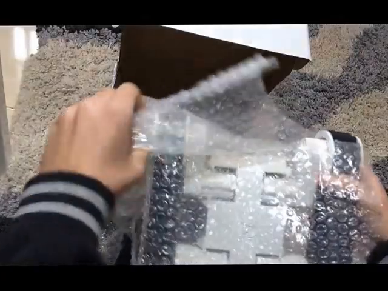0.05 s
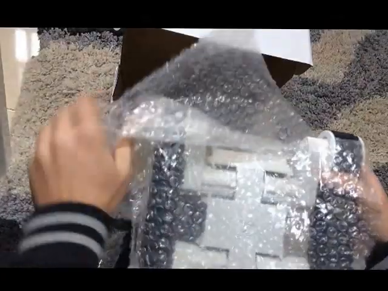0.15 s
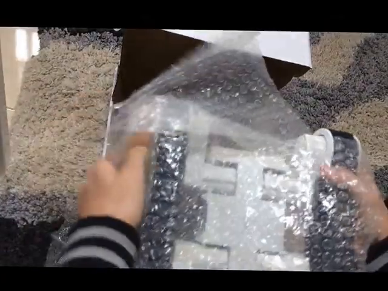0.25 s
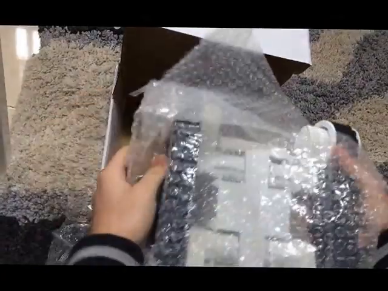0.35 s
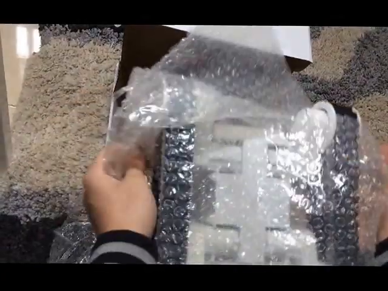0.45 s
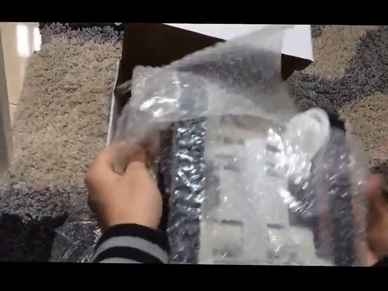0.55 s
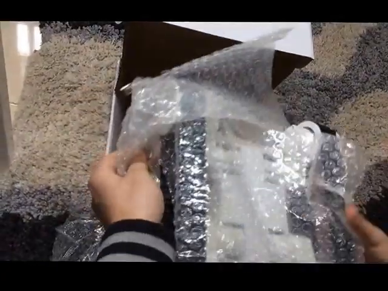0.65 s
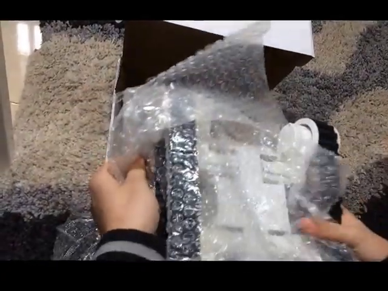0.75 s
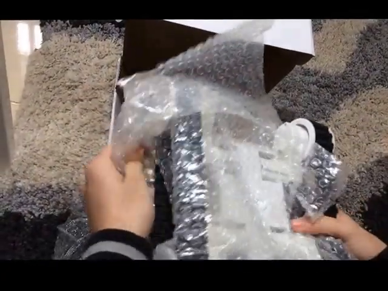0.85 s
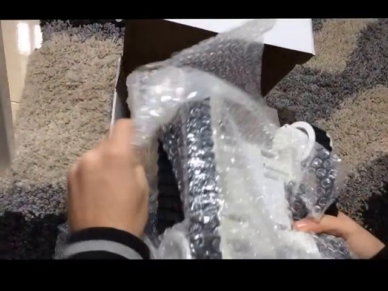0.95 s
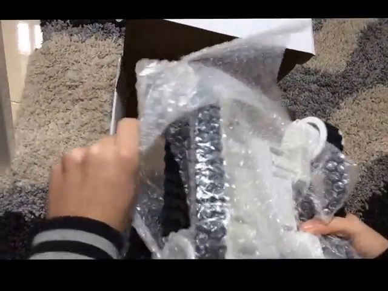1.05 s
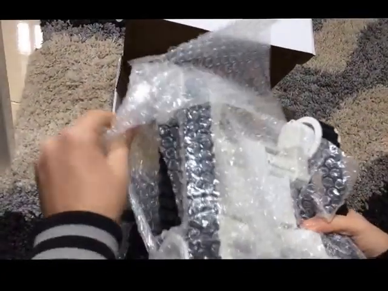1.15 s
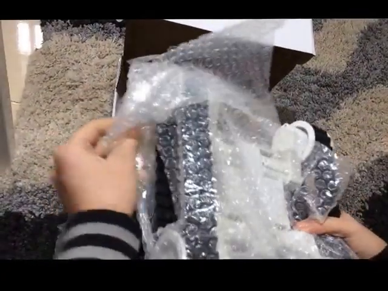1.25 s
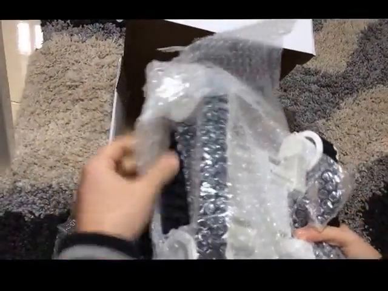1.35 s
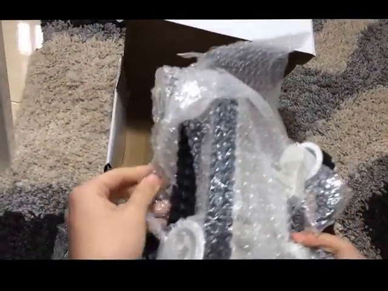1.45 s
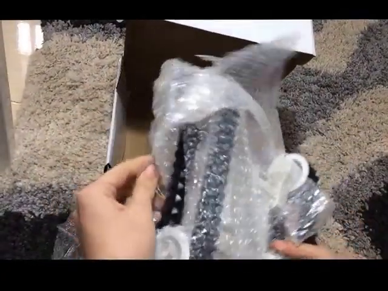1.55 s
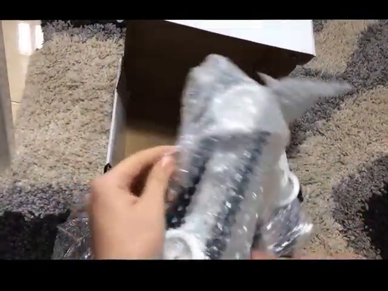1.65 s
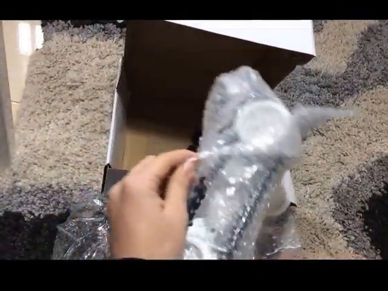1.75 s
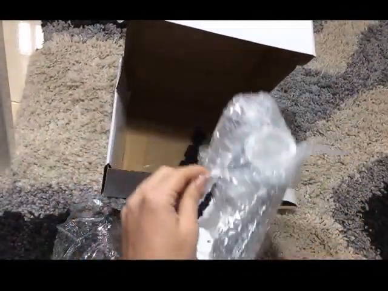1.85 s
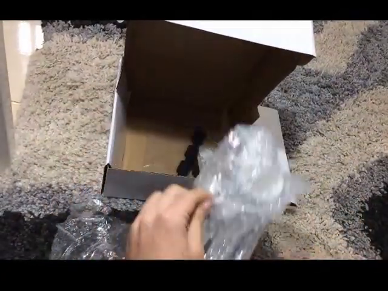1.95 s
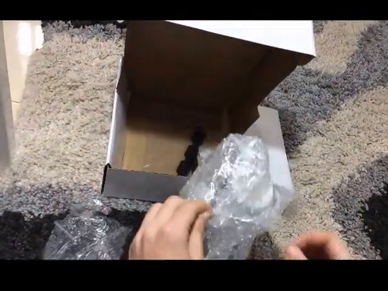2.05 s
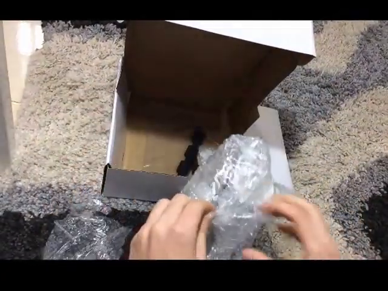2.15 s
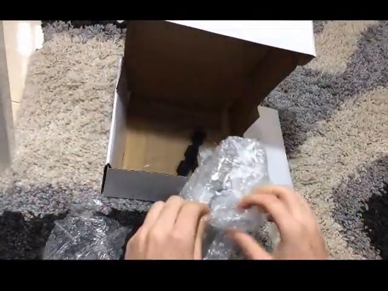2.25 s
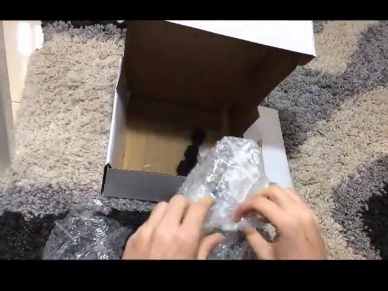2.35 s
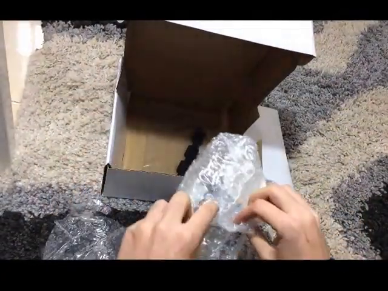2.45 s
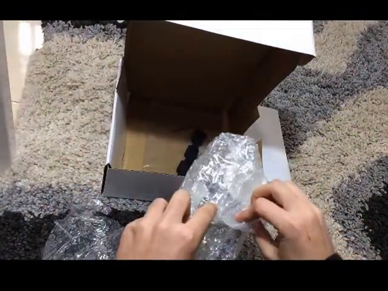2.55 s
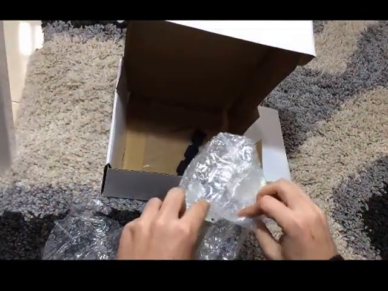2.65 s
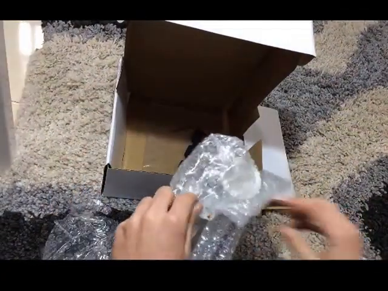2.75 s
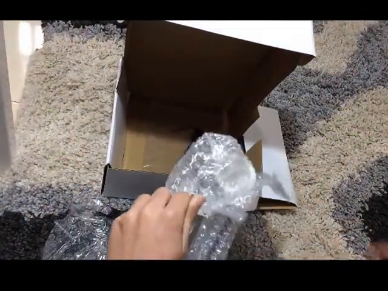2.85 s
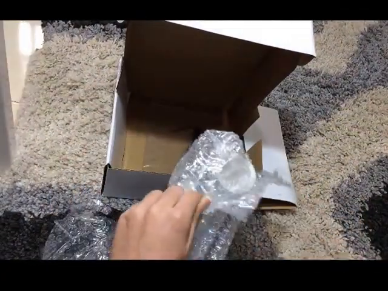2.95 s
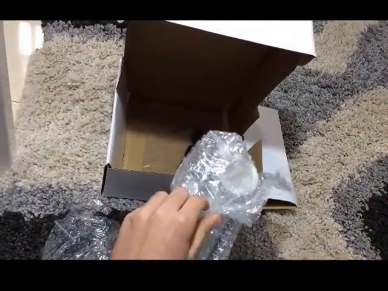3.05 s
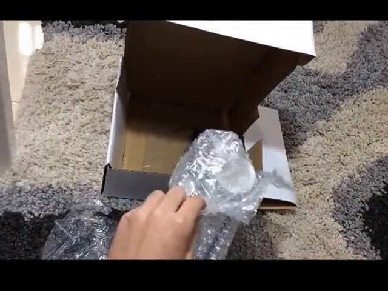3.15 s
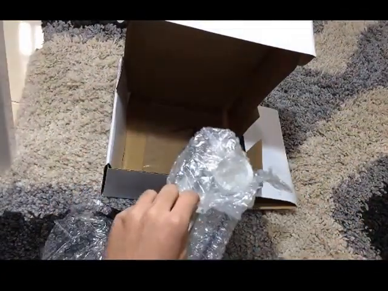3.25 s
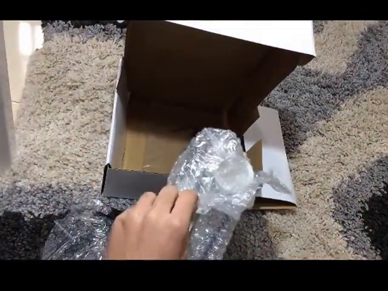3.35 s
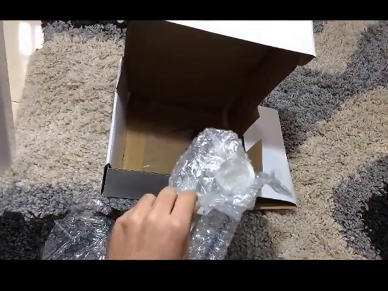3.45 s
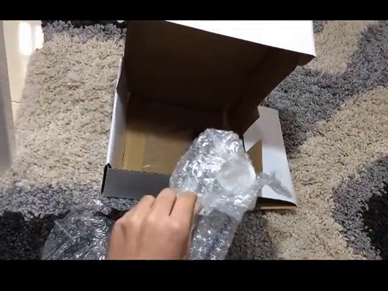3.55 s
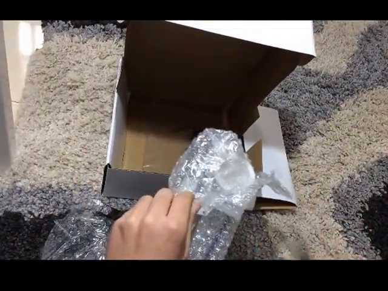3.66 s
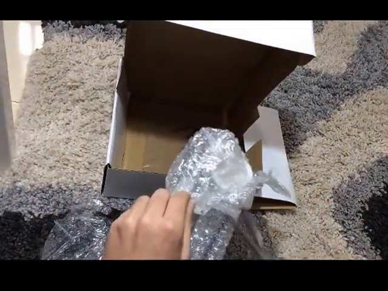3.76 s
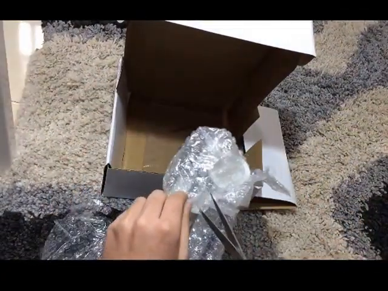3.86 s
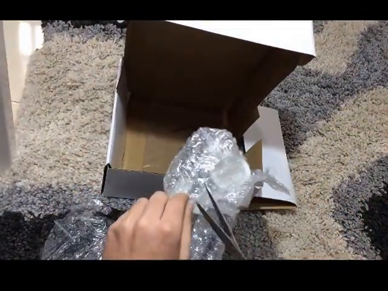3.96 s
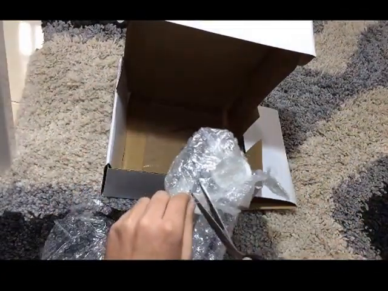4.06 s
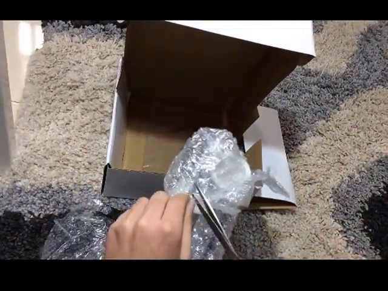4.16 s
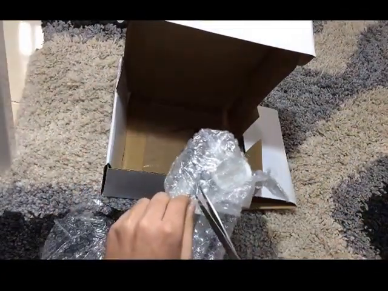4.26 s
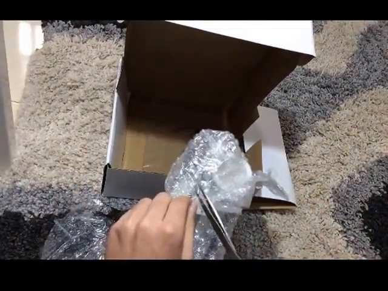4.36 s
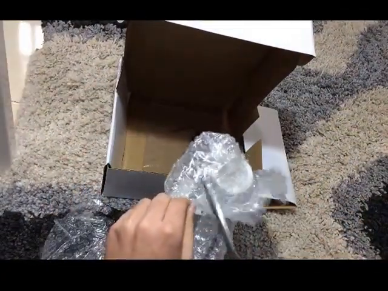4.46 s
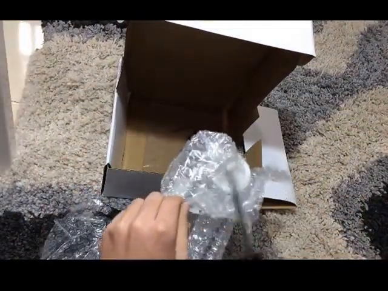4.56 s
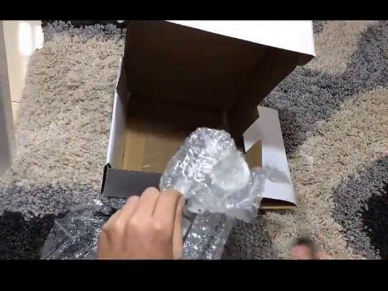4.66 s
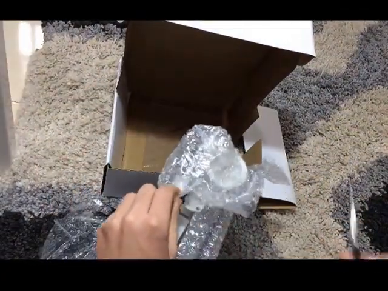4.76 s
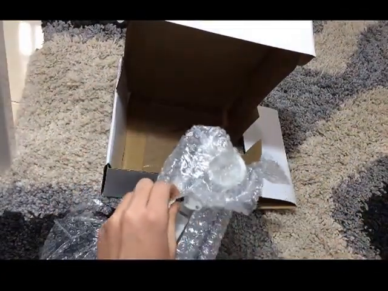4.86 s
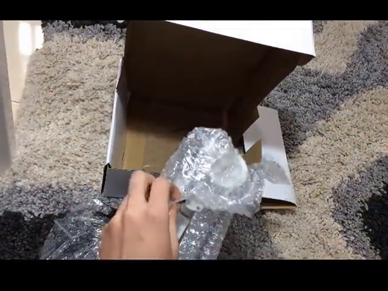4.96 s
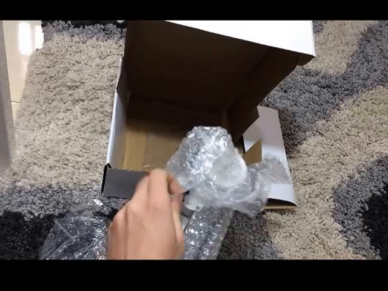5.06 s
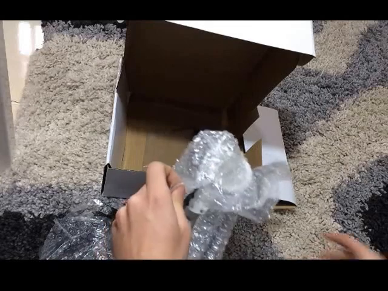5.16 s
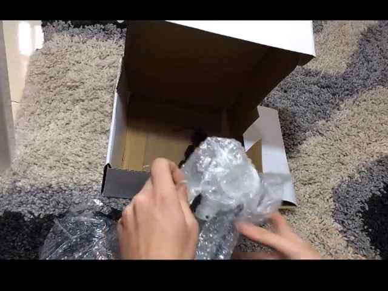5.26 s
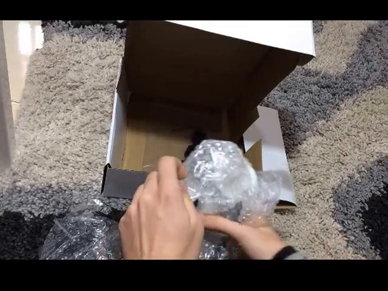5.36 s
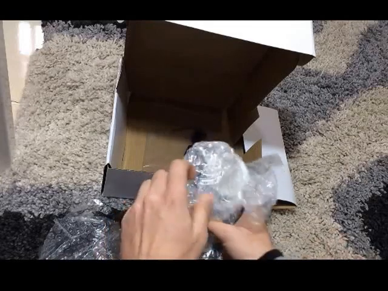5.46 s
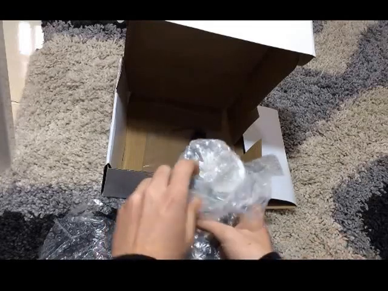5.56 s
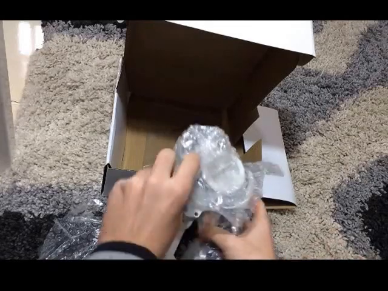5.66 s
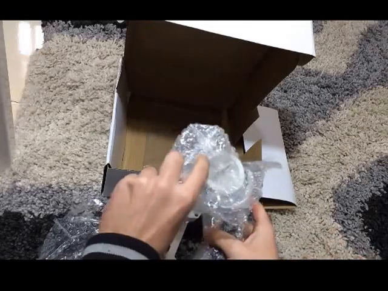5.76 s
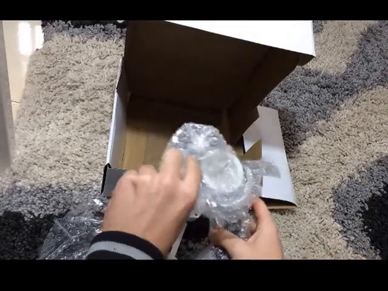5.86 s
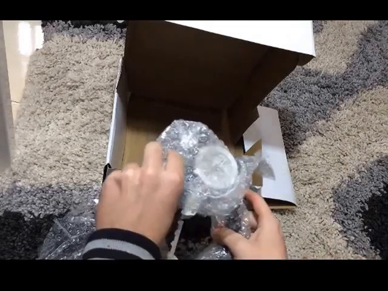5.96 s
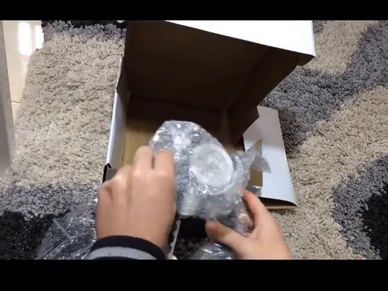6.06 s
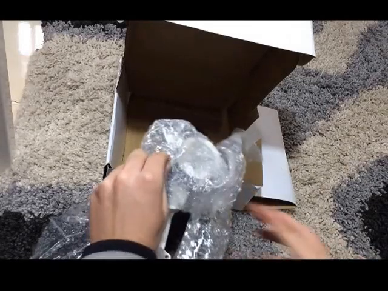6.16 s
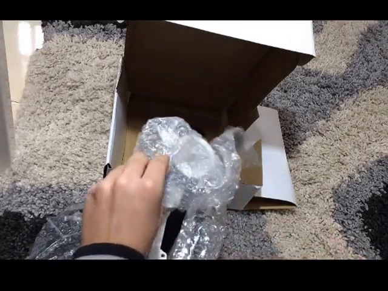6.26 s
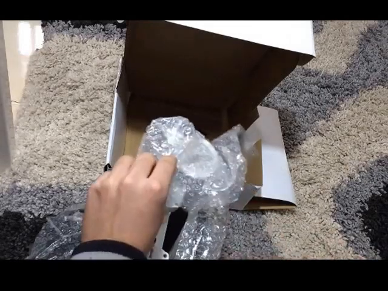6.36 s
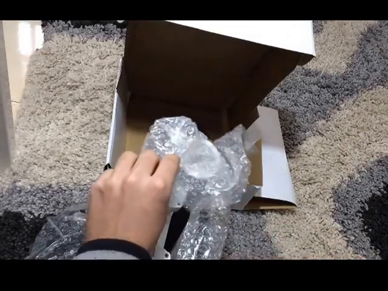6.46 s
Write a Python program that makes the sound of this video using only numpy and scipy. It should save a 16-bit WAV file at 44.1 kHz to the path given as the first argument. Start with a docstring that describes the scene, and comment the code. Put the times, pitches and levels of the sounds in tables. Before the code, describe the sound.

Close, bright bubble-wrap rustle in a small furnished room, over very faint low rumble and hiss. From 0 to 1.7 s hands tug and turn the wrapped object: uneven crinkling surges, fast crackles, hollow snaps and soft dull bumps, with a strong tug near 0.17 s and the hardest snap and thump around 1.1 s. It eases from 1.7 s with brief dips near 2.1 and 2.3 s, then a crisp, thinner crackle builds, densest at 2.7-3.0 s. It drops abruptly; 3.1-5.0 s is almost quiet, with faint ticks, one clear snip at 4.35 s and a sharper cluster with a small bump at 4.6 s. Rustling rises again from 5.2 s, fullest around 5.6-5.8 s, with loud snaps near 5.88 and 6.06 s, then softens into light crinkles and low muffled handling by 6.5 s.

```python
"""Dry film rustle, sharp crease snaps and dull bumps: hands peel bubble wrap off a plastic object over a cardboard box.
Rustle is coloured noise gated by swarms of tiny creases and scaled by the handling.
Snaps are short noise cracks with ringing air pockets; bumps are damped sines of the load and the cardboard.
A small furnished room answers snaps and bumps with decaying noise, over a low rumble and hiss of shaped noise."""
import sys
import numpy as np
from scipy import signal
from scipy.fft import rfft, irfft, next_fast_len
from scipy.io import wavfile
from scipy.ndimage import map_coordinates

SR = 44100
rng = np.random.default_rng(int(sys.argv[2]) if len(sys.argv) > 2 else 0)


def transcribe(signal):
    """Save signal, clipped to [-1, 1], as a 16-bit WAV file at the path in sys.argv[1]."""
    frames = np.atleast_2d(signal).T
    limited = np.clip(frames, -1, 1)
    pcm = np.round(limited * 32767).astype(np.int16)
    wavfile.write(sys.argv[1], SR, pcm)


N = 287532

# Clearest creases that snap: time_s, level_db (relative), brightness_db (upper re lower treble),
# ring_db (hollow ring of the air pockets, relative)
CLEAR_SNAPS = [(0.0653, -29.5, 9, -19), (0.1279, -41.5, -6, 5), (0.1491, -20.5, -1, -8.5),
               (0.1728, -20, 1, -10.5), (0.38, -36, 14, -9), (0.4035, -37, 0, -12), (0.6024, -33, 2, -22),
               (0.6322, -25.5, 4, -25), (0.6495, -26, -1, -22), (0.6563, -27.5, 1, -14),
               (0.7632, -30, 11, -14), (0.9001, -33, 2, -25), (0.9913, -35.5, 9, 0.5),
               (1.051, -24.5, 1, -9), (1.059, -23, -9, -9), (1.102, -36.5, -11, 5.5),
               (1.1363, -12, -5.5, -22.5), (1.16, -21, 0, -29), (1.1719, -24.5, 7, -11.5),
               (1.2434, -32, -3, -20), (1.3427, -32.5, -2, -23), (1.3864, -36, 3, -14),
               (1.4737, -27, -7, -19), (1.5141, -29.5, 2, -15), (1.5258, -36, -1, -15),
               (1.5354, -24, -9, -27), (1.5973, -26, 15, -25), (1.607, -23.5, 3, -39),
               (1.6333, -29, 2, -27), (1.6772, -33, 10, -24), (1.8287, -25, -15, -35),
               (1.8981, -27, -9, -33), (2.0415, -43, -1, -18), (2.1929, -50, 2, -11),
               (2.388, -33.5, 6, -10.5), (2.45, -30.5, 2, -23), (2.4774, -27, 13, -31),
               (2.5355, -38, -5, -1), (2.59, -36, -13, -26), (2.5922, -22.5, 9, -22),
               (2.6405, -22, 5.5, -27), (2.6441, -30, 14, -25), (2.6965, -33, 7, -16),
               (2.7252, -39, 11, -27), (2.737, -25, 4.5, -43), (2.773, -25, 8, -39),
               (2.8001, -29, -7, -13.5), (2.8058, -17.5, 2.5, -18.5), (2.8302, -24, -1, -39),
               (2.8756, -25.5, 14, -29), (2.8825, -21.5, 1.5, -17), (2.9231, -17.5, 3, -28),
               (2.9303, -23, 0, -21), (2.9331, -20, 6, -16), (2.977, -33, 8, -26), (2.99, -28, 7, -22),
               (2.9943, -26.5, 3, -16), (3.0067, -36, -1, -14), (3.0874, -41, -2, -13),
               (3.1068, -40.5, 2, -5), (3.1195, -40, -5, -17), (3.129, -34.5, 6, -19),
               (3.2336, -37, 1, -18), (3.2647, -43, -4, -27), (3.313, -35, -1.5, -15),
               (3.418, -47, -1, -21), (3.456, -42.5, 2, -18), (3.5285, -46, 16, -39),
               (3.5393, -48, -6, -14), (3.577, -51, 15, -24), (3.5996, -47, 3, -11.5),
               (3.6471, -50, 8, -13), (3.6792, -50, -7, -14), (3.7122, -35.5, -1, -26),
               (3.7446, -45.5, 5, -17), (3.8367, -46.5, 3, -11.5), (3.8686, -51.5, 4, -15),
               (3.9541, -47, 10.5, -19), (3.9697, -46.5, 3, -20), (4.0297, -35.5, 4.5, -15.5),
               (4.14, -54, -5.5, -19), (4.1552, -38.5, 1, -20.5), (4.2242, -59, -2, -19),
               (4.2475, -41, 2, -23), (4.3495, -41, 0, -24), (4.3542, -21, 4, -19),
               (4.4038, -31.5, 6.5, -35), (4.517, -46.5, 8, -17), (4.5843, -44, 1, -20),
               (4.5955, -50, 10, -5), (4.606, -24.5, -7, -29), (4.6098, -14, 29, -37),
               (4.612, -16.5, -2, -10.5), (4.6167, -23, 4, -10.5), (4.6275, -38, 3, -12),
               (4.6356, -26, -9, -34), (4.8091, -40.5, -2, -11.5), (4.8884, -36.5, 8.5, -31),
               (4.9453, -41, 0, -12), (4.9557, -40.5, 3, -20), (5.1013, -30, -1.5, -23),
               (5.1841, -43, 16, -20), (5.215, -31, 7, -23), (5.2459, -26, 5, -22), (5.253, -32.5, -4, -16),
               (5.2872, -29, -1, -18.5), (5.3845, -31, -4, -34), (5.397, -34, -4, -14),
               (5.448, -41, 4, -21), (5.506, -33.5, 1, -12.5), (5.592, -28.5, 17, -12.5),
               (5.7789, -35, 9, -23), (5.862, -29, 12, -13), (5.8767, -16, 0, -14.5),
               (5.9375, -40, -4, -14), (5.9605, -29.5, 4, -15), (5.9856, -26.5, 7, -18.5),
               (6.025, -24, 1.5, -12.5), (6.0387, -41, 9, -26), (6.0603, -21, -2, -13.5),
               (6.0666, -18, -6, -19), (6.0869, -25, 2, -36), (6.1936, -37, 11, -10.5),
               (6.2191, -31, 9, -22), (6.3011, -38.5, -3, -3), (6.3404, -35, -1, -5.5),
               (6.373, -31.5, 1, -20), (6.441, -41.5, -22, 5), (6.453, -58, -2, -3),
               (6.5125, -42.5, -1, -29)]


def amp(db):
    """Amplitude factor of a level in dB."""
    return 10 ** (np.asarray(db) / 20)


def unit(x):
    """Each row at rms 1."""
    return x / np.sqrt(np.mean(x ** 2, axis=-1, keepdims=True) + 1e-20)


def along(points, hz):
    """(Hz, value) points interpolated on a log frequency axis."""
    f, v = np.transpose(points)
    return np.interp(np.log(hz + 1), np.log(f + 1), v)


def wobble(knots_per_s):
    """Smooth random curve through normal knots."""
    knots = rng.standard_normal(int(N * knots_per_s / SR) + 4)
    return map_coordinates(knots, [np.arange(N) * knots_per_s / SR])


def filtered(x, response):
    """x times a gain that depends on frequency."""
    n = x.shape[-1]
    m = next_fast_len(n + 4096)
    return irfft(rfft(x, m) * response(np.fft.rfftfreq(m, 1 / SR)), m)[..., :n]


def coloured(x, spectrum):
    """x through a (Hz, dB) spectrum, at rms 1."""
    return unit(filtered(x, lambda hz: amp(along(spectrum, hz))))


def place(times_s, shapes):
    """Sum of one short shape per event."""
    starts = np.round(np.asarray(times_s) * SR).astype(int)[:, None]
    at = starts + np.arange(shapes.shape[1])
    return np.bincount(np.clip(at, 0, N).ravel(), shapes.ravel(), N + 1)[:N]


def air():
    """Shaped noise: the room's low rumble drifts, the hiss above it is even."""
    level_db, rumble_top_hz = -71, 200
    # Noise spectrum before the rumble lift: freq_hz, level_db (relative, per Hz)
    air_spectrum = [(26, -25), (48, 3), (108, 5), (185, -7.5), (531, -7), (591, -14.5), (1370, -18.5),
                    (4140, -20.5), (10100, -37), (14800, -42), (16000, -47)]
    noise = coloured(rng.standard_normal(N), air_spectrum)
    rumble = filtered(noise, lambda hz: hz < rumble_top_hz)
    hiss = noise - rumble
    rumble_lift_db = 7.5 + 2.5 * wobble(3.01)
    return amp(level_db) * (hiss + amp(rumble_lift_db) * rumble)


def room(x):
    """Each frequency dies at its own speed; a fresh noise tail is drawn for every quarter second of sound."""
    # Decay of the room: freq_hz, t60_s
    wall_decay = [(200, 0.22), (1300, 0.27), (4000, 0.15), (12000, 0.13)]
    out, step = np.zeros(N + SR), SR // 4
    delay = 130  # samples
    for start in range(0, N, step):
        hz, t, z = signal.stft(rng.standard_normal(SR // 4), SR, nperseg=128)
        decay = amp(-60 * t / along(wall_decay, hz)[:, None])
        tail = signal.istft(z * decay, SR, nperseg=128)[1]
        wet = signal.fftconvolve(x[start:start + step], tail / np.linalg.norm(tail))
        out[start + delay:][:len(wet)] += wet
    return out[:N]


def handling(now_s):
    """Rustle level and heft in dB: each tug jumps in, sags, then dies away over the steady pull, powers adding."""
    rise_s, sag_db_per_s, fall_db_per_s = 0.012, 19, 280
    # Steady handling: time_s, pull_db (rustle level), heft_db (load in the hands, relative to the rustle)
    steady_pull = [(0.0, -55, -3.5), (0.33, -52, -6.5), (0.5, -54, -2), (0.85, -50.5, -8.5), (1.1, -53, -3),
                   (1.3, -49, -7), (1.55, -50, -8.5), (1.7, -57.5, -3), (2.05, -53.5, -5.5),
                   (2.1, -60, -0.5), (2.19, -53.5, -10.5), (2.25, -65.5, -2.5), (2.3, -62.5, -4.5),
                   (2.34, -51, -10), (2.75, -53, -9), (3.0, -79, -16.5), (3.05, -60.5, -8), (3.3, -69, -2),
                   (3.6, -74.5, 0), (3.95, -75.5, -0.5), (4.3, -78.5, -3), (4.6, -68.5, -10),
                   (4.9, -72, -1.5), (5.18, -60.5, -15), (5.25, -53, -13), (5.4, -50, -12),
                   (5.6, -45.5, -12), (5.69, -51.5, -4.5), (5.76, -47, -12), (5.94, -57, -4),
                   (6.17, -55.5, -16), (6.37, -57, 2.5), (6.43, -61.5, -7), (6.52, -68, 1)]
    # Short tugs on the film: start_s (full level; the rise comes before), length_s, level_db (rustle)
    short_tugs = [(0.044, .03, -47.5), (0.167, 0.099, -39), (0.362, 0.014, -47), (0.446, 0.1, -47),
                  (0.586, 0.098, -45), (0.736, 0.015, -44.5), (0.9, 0.061, -47), (1.034, 0.025, -42.5),
                  (1.108, 0.038, -40), (1.596, 0.014, -44.5), (1.707, 0.085, -49.5), (2.833, 0.084, -47),
                  (2.912, 0.012, -43.5), (2.982, 0.017, -48.5), (3.19, 0.029, -62.5), (4.159, 0.02, -63),
                  (4.368, 0.0083, -66), (4.63, 0.033, -51), (5.053, 0.032, -53.5), (5.773, 0.066, -42.5),
                  (6.04, 0.068, -49.5), (6.237, 0.049, -48.5)]
    s, pull_db, heft_db = np.transpose(steady_pull)
    power = amp(2 * np.interp(now_s, s, pull_db))
    for start_s, length_s, level_db in short_tugs:
        t = now_s - start_s
        sag_db = sag_db_per_s * np.clip(t, 0, length_s)
        fall_db = fall_db_per_s * np.clip(t - length_s, 0, None)
        rise = np.exp(np.clip(t, None, 0) / rise_s)
        power = power + amp(2 * (level_db - sag_db - fall_db)) * rise
    return 10 * np.log10(power), np.interp(now_s, s, heft_db)


def crackle(count, spread_db, life_s):
    """Loudness envelope of countless tiny creases: mostly faint, a few sharp, each dying at once."""
    largest_rank = 0.985  # caps the size of a crease
    when, size = rng.random((count, 2)).T
    t = np.arange(256) / SR
    peak = amp(-spread_db * np.log(1 - largest_rank * size))
    return place(when * N / SR, peak[:, None] * np.exp(-t / life_s))


def rustle():
    """Film and folded layers: noise gated by tiny creases that clump as the film slips; the load rubs below."""
    slow_swing_db, quick_swing_db = 1.3, 1.8
    folds_db_re_film, folds_heft_share = 1, 0.98
    # Noise spectra: freq_hz, level_db (relative, per Hz)
    film_spectrum = [(1180, -12), (2000, -7), (4230, -5), (5120, -5), (6250, -4.5), (14700, -9),
                     (15600, -9), (16000, -36)]
    folds_spectrum = [(400, -43.5), (600, -3.5), (1000, 1), (2000, 0), (2800, -3), (4000, -15)]
    load_spectrum = [(80, -22), (140, 5.5), (180, -5), (300, -3), (500, -7.5), (800, -33.5)]

    film_db, heft_db = handling(np.arange(N) / SR)
    folds_db = film_db + folds_db_re_film + folds_heft_share * heft_db
    load_db = film_db + heft_db - 1.0

    slips_db = slow_swing_db * wobble(28) + quick_swing_db * wobble(90)
    steady_bed = 3.2
    gate = amp(slips_db) * (steady_bed + crackle(count=7000, spread_db=4.5, life_s=0.00057))
    film = coloured(gate * rng.standard_normal(N), film_spectrum)
    folds = coloured(gate ** 0.91 * rng.standard_normal(N), folds_spectrum)
    load_swing = amp(0.58 * slips_db + 4.4 * wobble(18))
    load = coloured(load_swing * rng.standard_normal(N), load_spectrum)
    return amp(film_db) * film + amp(folds_db) * folds + amp(load_db) * load


def faint_bumps(count):
    """Bump rows at chance moments, as loud as the rubbing of the load makes them."""
    db_re_load, spread_db, middle_hz = 6, 2, 260.4
    s, z = rng.random(count) * N / SR, rng.standard_normal((count, 2))
    db = sum(handling(s)) + db_re_load + spread_db * z[:, 0]
    return np.column_stack([s, db, middle_hz * np.exp(0.2 * z[:, 1])])


def bumps():
    """Soft contacts: a few damped cycles of the load and the cardboard, with a rounded start."""
    # Clearest dull bumps of the load: time_s, level_db (relative), pitch_hz (nominal; partials lie around it)
    clear_bumps = [(0.09, -42.5, 267), (0.135, -33, 395), (0.149, -34, 239), (0.16, -32.5, 73),
                   (0.173, -32.5, 317), (0.206, -32, 287), (0.232, -42, 342), (0.378, -44, 210),
                   (0.471, -33, 265), (0.513, -37, 333), (0.605, -44, 274), (0.649, -38, 300),
                   (0.805, -36.5, 210), (0.9, -42, 188), (0.999, -38, 221), (1.037, -29.5, 232),
                   (1.104, -24, 379), (1.146, -28, 242), (1.15, -36.5, 92), (1.182, -39.5, 305),
                   (1.636, -38.5, 216), (1.734, -36, 370), (2.015, -45, 353), (2.54, -39, 430),
                   (2.807, -46, 333), (2.883, -42, 430), (2.937, -45.5, 390), (4.616, -37, 189),
                   (5.39, -40, 174), (5.653, -44.5, 244), (5.829, -38, 222), (6.276, -47, 148),
                   (6.356, -46, 223), (6.443, -47, 276)]
    s, db, hz = np.transpose([*clear_bumps, *faint_bumps(count=50)])[:, :, None]
    t = np.arange(4400) / SR
    partials = [(.7, 2), (1.05, 2.5), (1.6, -2), (2.7, -6.5)]  # (ratio to pitch, dB)
    body = sum(amp(level) * np.sin(2 * np.pi * (hz * ratio * t + rng.random(s.shape)))
               for ratio, level in partials)
    rise = 1 - np.exp(-t / 0.0014)
    decay = np.exp(-t * hz / 1.64)  # time constant 1.64 cycles
    return place(s[:, 0] - .004, amp(db - 17.0) * unit(body * rise * decay))


FAINT_COLOUR_SPREAD_DB = 9  # brightness and ring of chance creases, brightness of neighbours


def faint_snaps(count):
    """Snap rows at chance moments, as loud as the handling makes them."""
    db_re_rustle, spread_db = 8, 0.5
    bright_db, ring_db = 13.5, -20.5
    s, z = rng.random(count) * N / SR, rng.standard_normal((count, 3))
    db = handling(s)[0] + db_re_rustle + spread_db * z[:, 0]
    colour = [bright_db, ring_db] + FAINT_COLOUR_SPREAD_DB * z[:, 1:]
    return np.column_stack([s, db, colour])


def neighbours(count):
    """Fainter creases give way around each clear snap, mostly just after."""
    lag_s, lag_spread_s = .007, .006
    db_re_snap, spread_db = -17, 3
    rows = np.repeat(CLEAR_SNAPS, count, axis=0)
    z = rng.standard_normal(rows.shape)
    spread = [lag_spread_s, spread_db, FAINT_COLOUR_SPREAD_DB, spread_db]
    return rows + [lag_s, db_re_snap, 0, 0] + spread * z


def snaps():
    """A crease buckles: a sub-millisecond crack, a fainter after-rattle, and the air pockets ring briefly."""
    # Ringing air pockets: freq_hz, level_db (relative, before tilt and spread), t60_s
    air_pockets = [(728, -13, 0.048), (1024, -0.5, 0.045), (1260, -0.5, 0.031), (1436, 7, 0.036),
                   (1745, 10, 0.024), (2310, 8, 0.02), (2880, 6, 0.023)]
    pocket_spread_db, pitch_spread = 3.5, 0.073
    tilt, pivot_hz = 0.19, 1500  # dB per octave for each dB of brightness: dull snaps ring the big pockets
    rows = [*CLEAR_SNAPS, *neighbours(count=2), *faint_snaps(count=320)]
    s, db, bright_db, ring_db = np.transpose(rows)[:, :, None]
    t = np.arange(1000) / SR

    rise = 1 - np.exp(-t / 0.000064)
    after_rattle = amp(-10.5) * np.exp(-t / 0.0027)
    shape = rise * (np.exp(-t / 0.00038) + after_rattle)
    burst = shape * rng.standard_normal((len(s), len(t)))
    dull = filtered(burst, lambda hz: np.exp(-(np.log((hz + 1) / 4400) / 0.53) ** 4))
    sharp = filtered(burst, lambda hz: np.exp(-(np.log((hz + 1) / 10500) / 0.43) ** 4))
    sharp_share = 1 / (1 + amp(-2 * bright_db))  # of the power
    crack = np.sqrt(1 - sharp_share) * unit(dull) + np.sqrt(sharp_share) * unit(sharp)

    ring = np.zeros((len(s), len(t)))
    for hz, level_db, t60_s in air_pockets:
        tilt_db = tilt * bright_db * np.log2(hz / pivot_hz)
        chance_db = rng.normal(0, pocket_spread_db, s.shape)
        pocket_hz = hz * rng.normal(1, pitch_spread, s.shape)
        decay_db = -60 * t / t60_s
        ring += amp(level_db + tilt_db + chance_db + decay_db) * np.sin(2 * np.pi * pocket_hz * t)
    sound = amp(-19.5) * crack + amp(ring_db - 10.0) * unit(ring)
    return place(s[:, 0] - .0005, amp(db) * sound)


def scene():
    """Air, rustle and hits; the room answers the hits only."""
    hits = snaps() + bumps()
    return (rustle() + hits + amp(-9.5) * room(hits) + air())[None]


def record(dry):
    """The microphone chain cuts the top steeply: 1 dB per 16 Hz above its band edge."""
    edge_hz = 15100
    return filtered(dry, lambda hz: amp(-np.clip(hz - edge_hz, 0, None) / 16))


dry = scene()
out = record(dry)
transcribe(out)
```